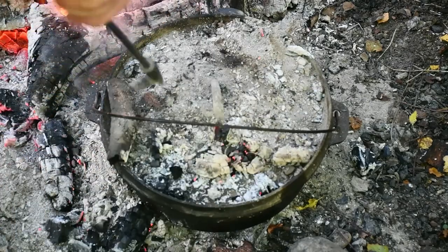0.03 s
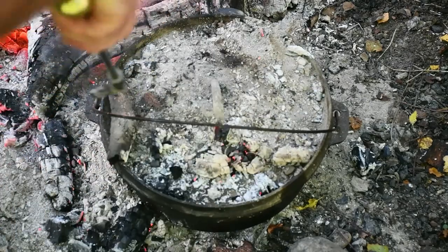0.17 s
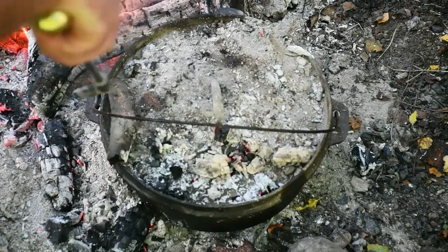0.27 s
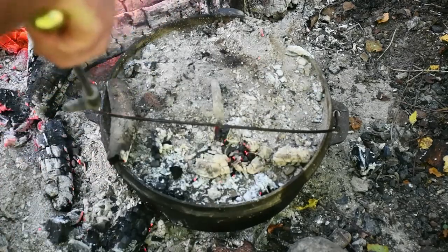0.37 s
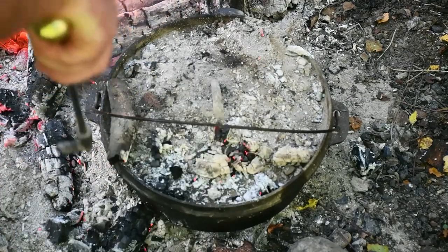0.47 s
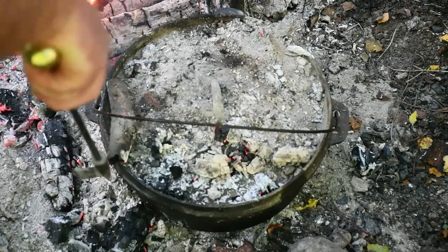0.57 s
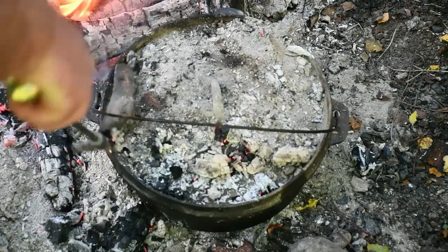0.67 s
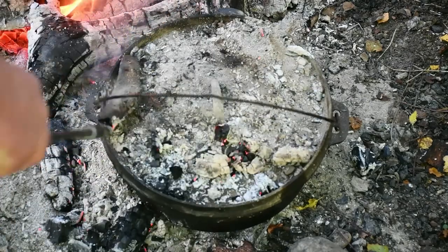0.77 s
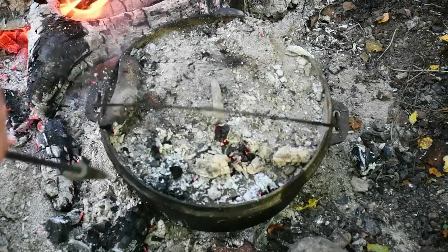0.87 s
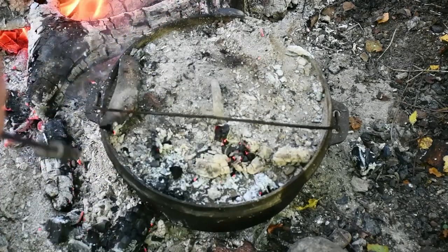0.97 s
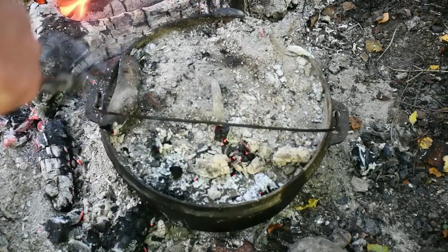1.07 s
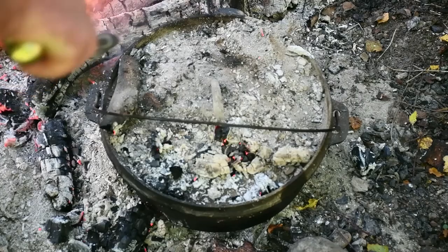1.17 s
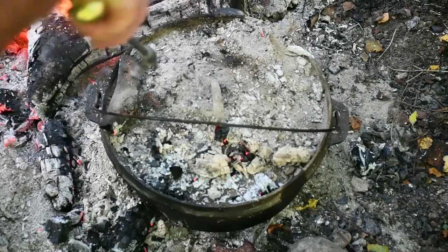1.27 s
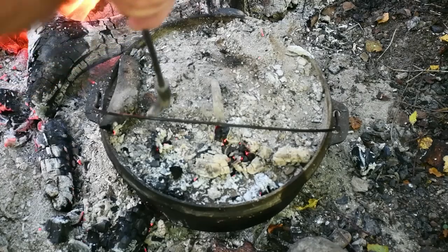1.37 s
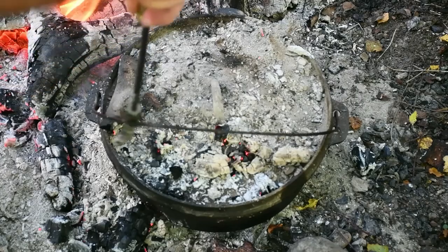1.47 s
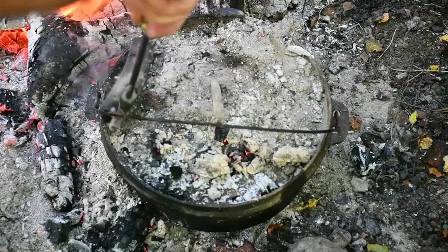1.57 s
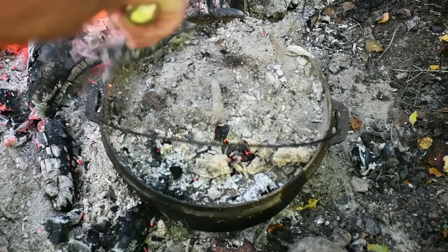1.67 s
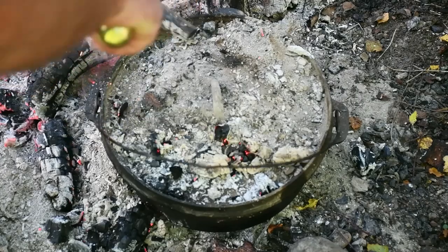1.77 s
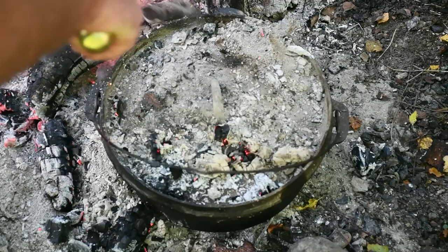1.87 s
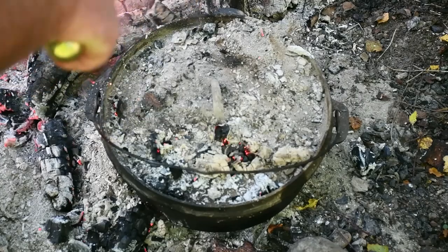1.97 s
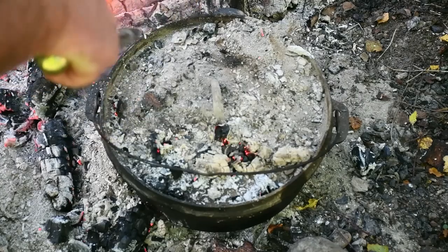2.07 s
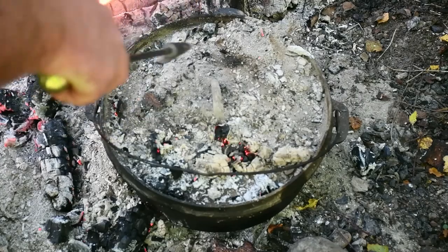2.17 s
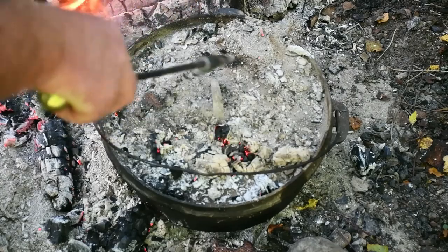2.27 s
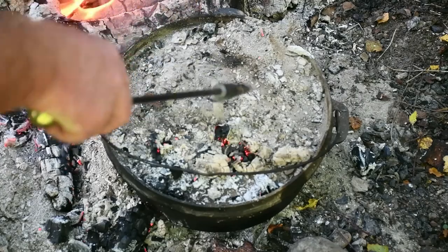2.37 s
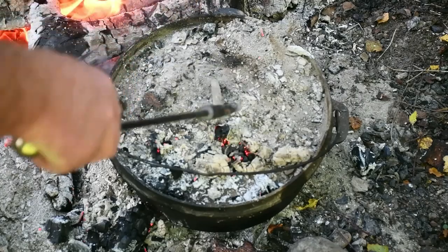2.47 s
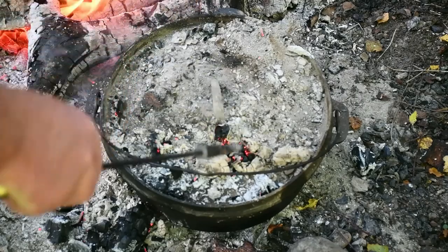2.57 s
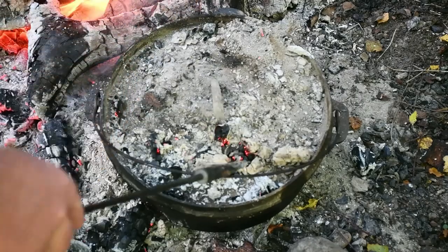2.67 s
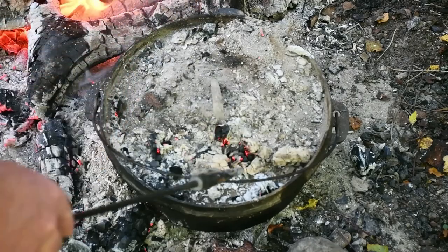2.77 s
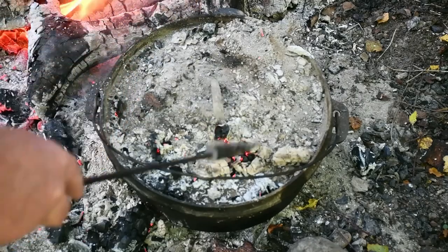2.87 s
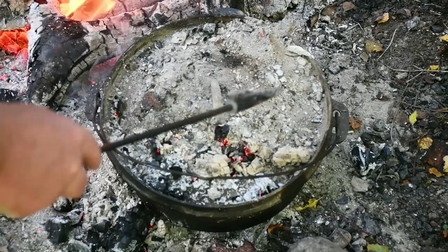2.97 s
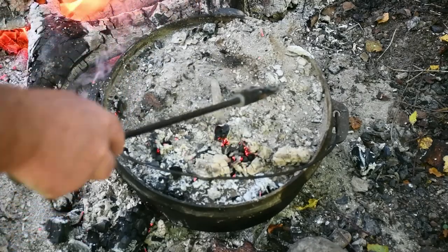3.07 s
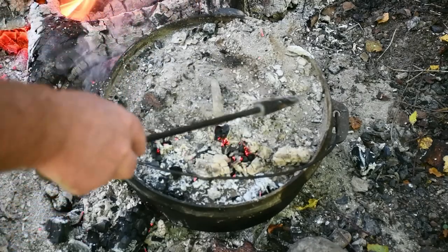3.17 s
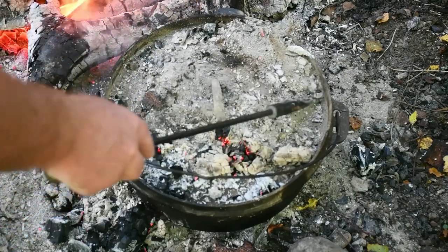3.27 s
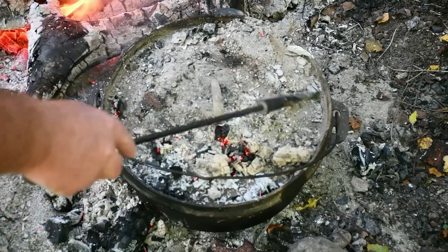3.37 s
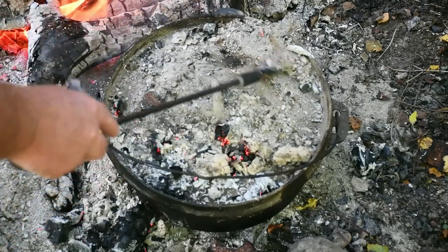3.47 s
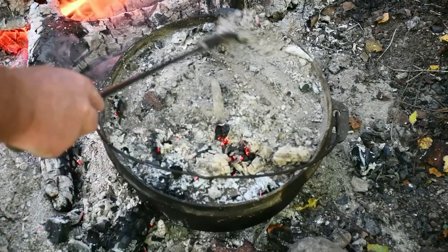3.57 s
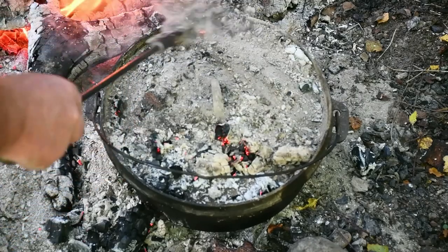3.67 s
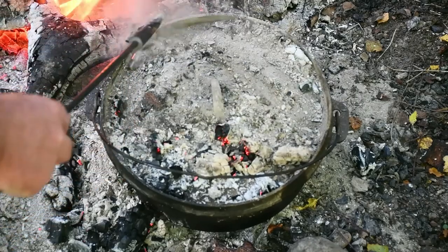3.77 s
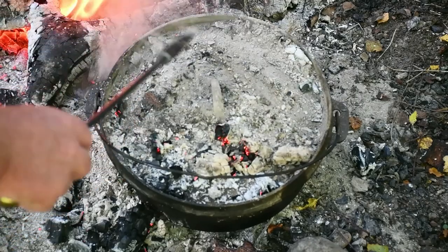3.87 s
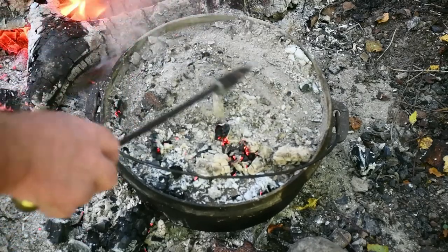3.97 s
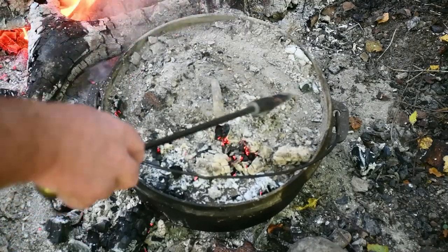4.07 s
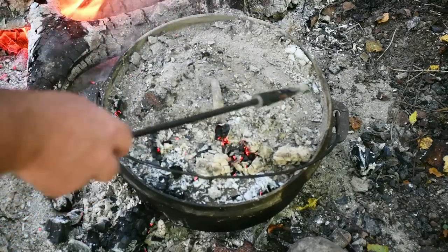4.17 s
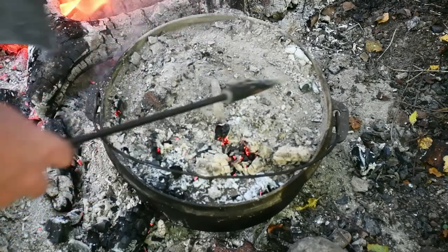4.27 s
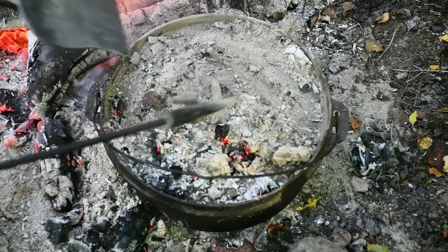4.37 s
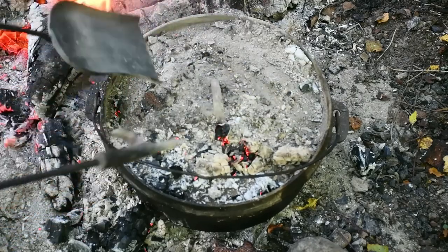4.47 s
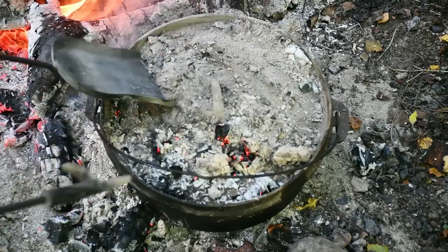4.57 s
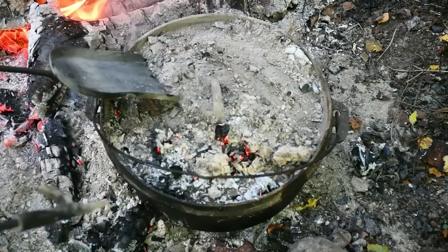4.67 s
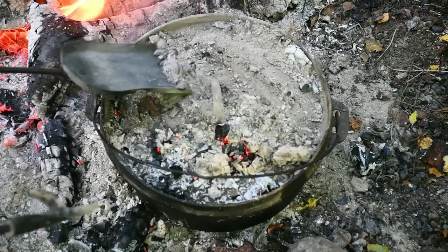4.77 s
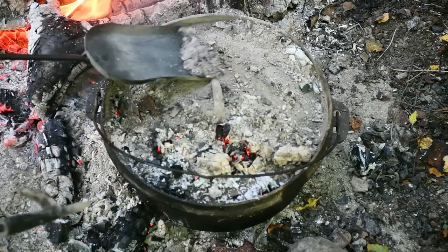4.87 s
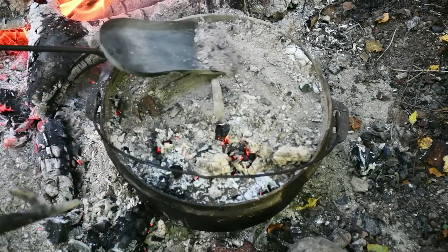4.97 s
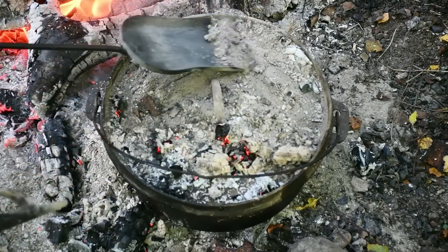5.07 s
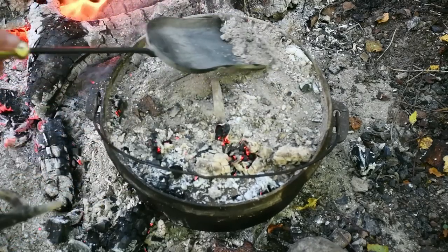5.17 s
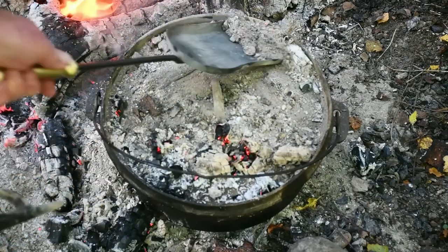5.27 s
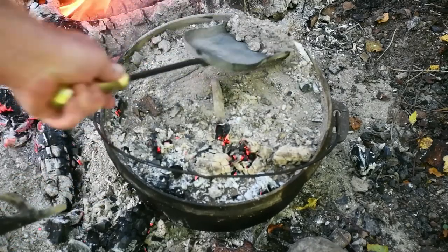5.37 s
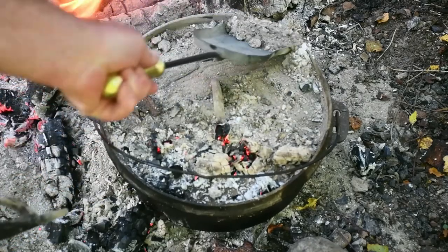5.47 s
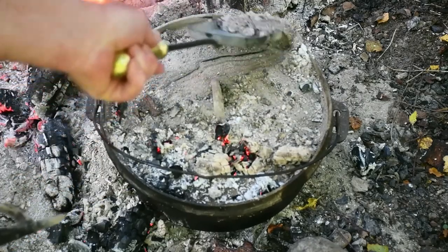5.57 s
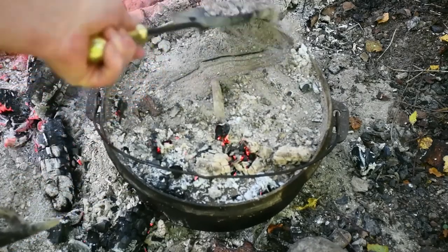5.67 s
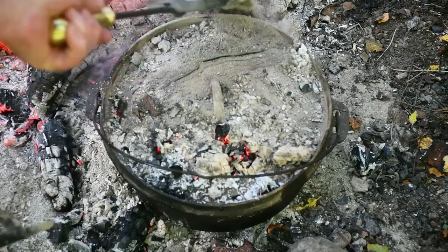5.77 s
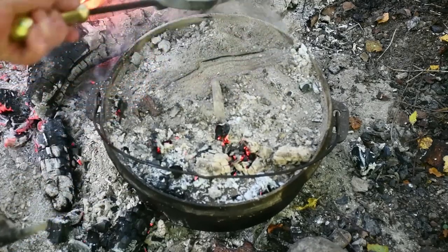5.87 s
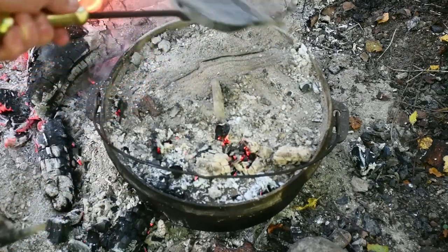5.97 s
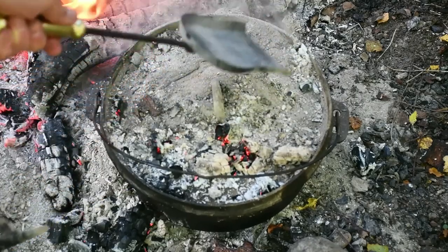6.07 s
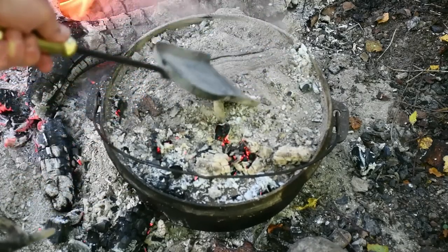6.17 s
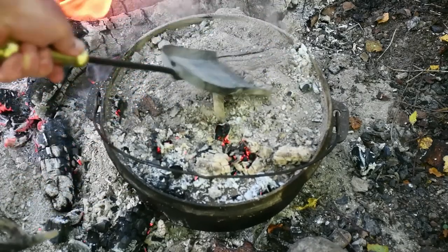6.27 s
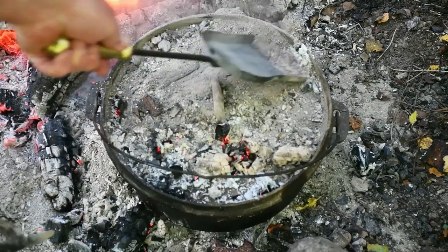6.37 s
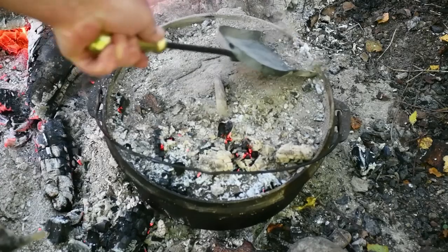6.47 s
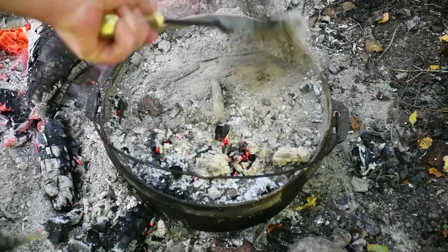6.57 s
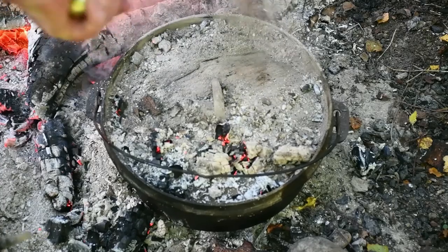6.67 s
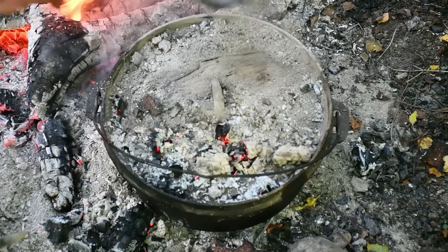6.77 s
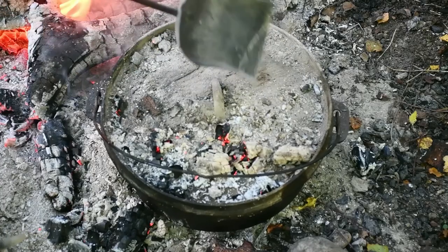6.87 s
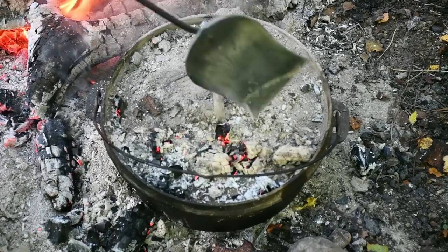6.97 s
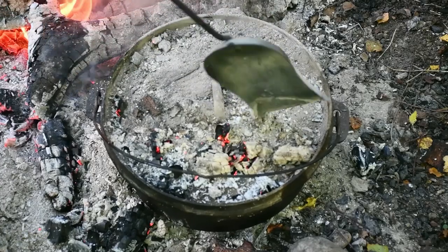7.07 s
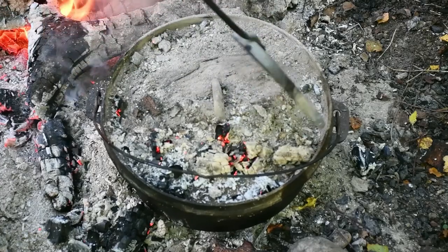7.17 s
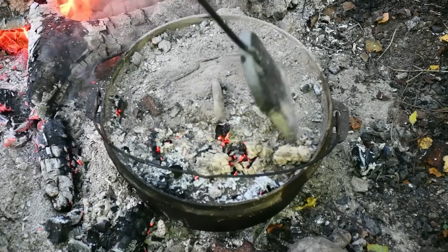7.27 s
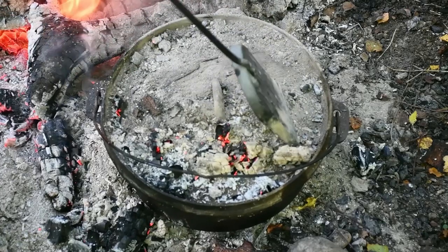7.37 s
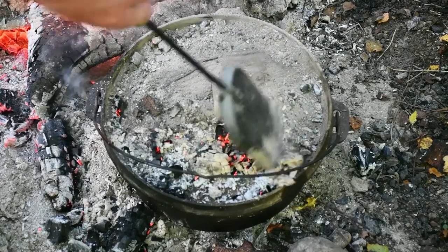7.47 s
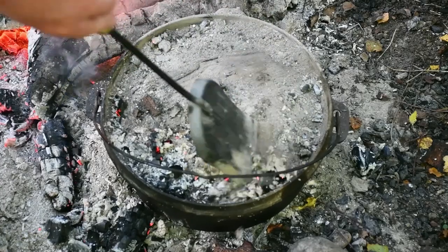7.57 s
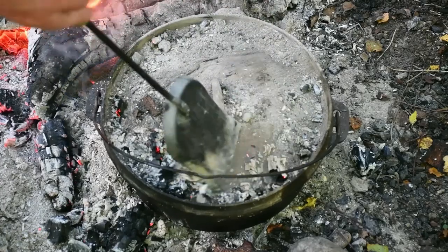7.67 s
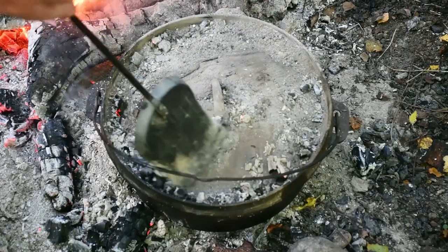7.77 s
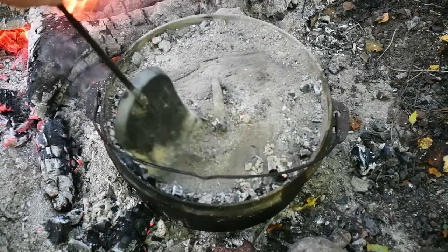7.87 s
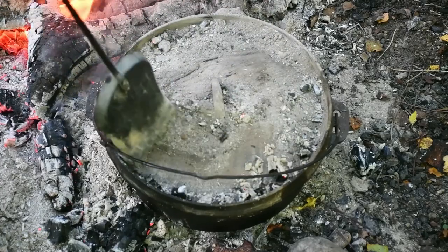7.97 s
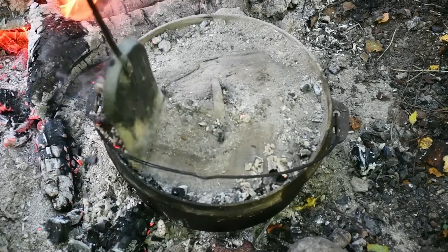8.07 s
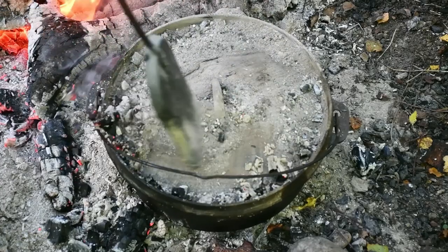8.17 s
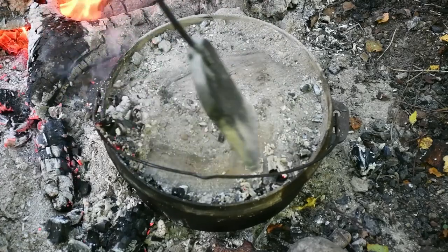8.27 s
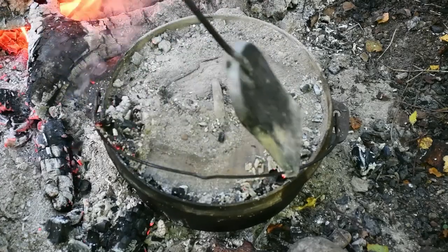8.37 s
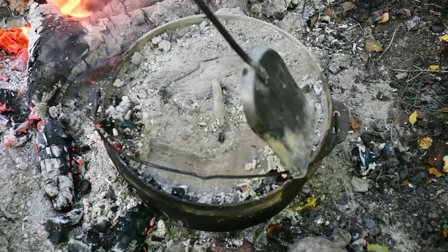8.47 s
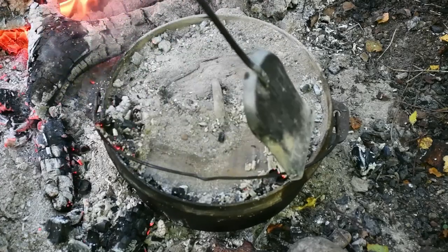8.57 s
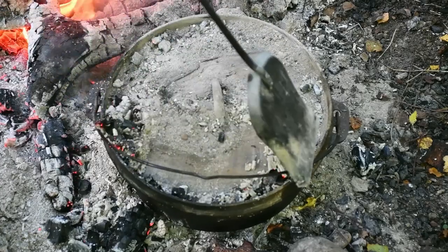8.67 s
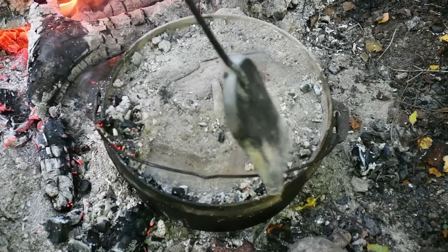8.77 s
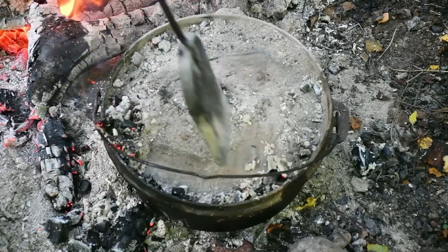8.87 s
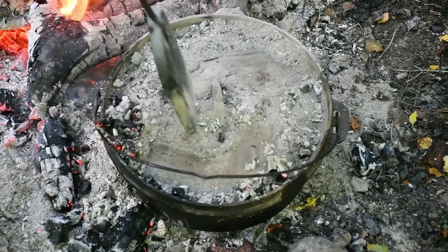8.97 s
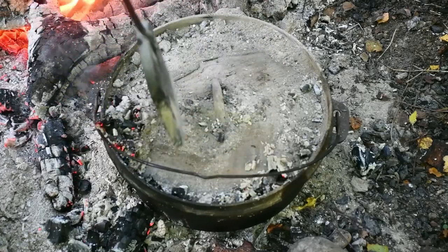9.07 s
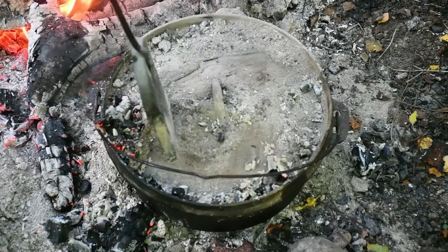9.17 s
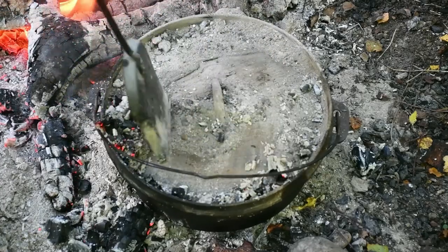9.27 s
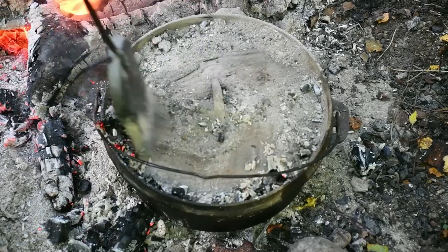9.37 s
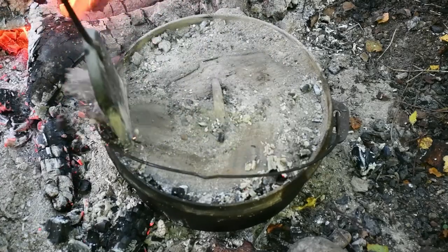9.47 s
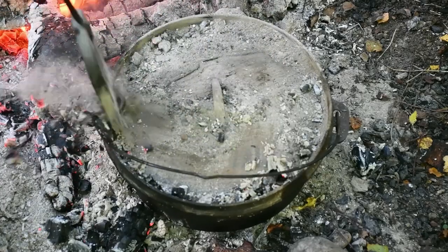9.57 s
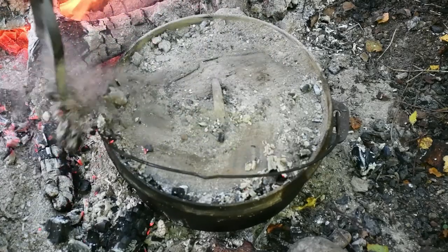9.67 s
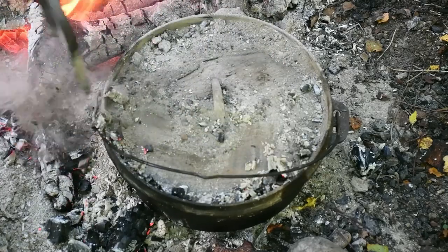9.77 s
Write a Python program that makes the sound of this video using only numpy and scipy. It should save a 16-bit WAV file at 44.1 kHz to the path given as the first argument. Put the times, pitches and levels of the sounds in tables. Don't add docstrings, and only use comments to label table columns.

```python
import sys
import numpy as np
from scipy import signal
from scipy.fft import rfft, irfft
from scipy.io import wavfile
from scipy.ndimage import uniform_filter1d

SR = 44100
rng = np.random.default_rng(int(sys.argv[2]) if len(sys.argv) > 2 else 0)


def digitize_waveform(pressure):
    field = np.atleast_2d(pressure).T
    bounded = np.clip(field, -1, 1)
    quanta = np.round(bounded * 32767).astype(np.int16)
    wavfile.write(sys.argv[1], SR, quanta)


def gain_from_decibels(decibels):
    exponent = np.asarray(decibels, float) / 20
    return 10 ** exponent


N = 433503

SIDES = np.array([[.5], [-.5]])


def evened(x):
    return x / np.sqrt(np.mean(abs(x) ** 2) + 1e-20)


def read(points, hz):
    f, value = np.transpose(points)
    return np.interp(np.log(hz + 1), np.log(f + 1), value)


def add(mix, s, sound):
    part = mix[:, round(s * SR):][:, :sound.shape[1]]
    part += sound[:, :part.shape[1]]


def pair(a, b, same):
    turn = np.arccos(np.clip(same, -1, 1)) / 2
    shared, apart = np.cos(turn) * a, np.sin(turn) * b
    return np.array([shared + apart, shared - apart])


def own_chance():
    return np.random.default_rng(rng.integers(2 ** 32))


# frequency in Hz, density in dB per Hz.
AIR_SPECTRUM = [(20, -46), (60, 3), (200, -12), (472, -8), (1120, -3), (2300, -11.5), (6180, -16.5),
                (8410, -11.5), (10800, -21.5), (16000, -21.5)]
# frequency in Hz, left-right likeness from -1 to 1.
AIR_LIKENESS = [(60, 0.99), (240, 0.56), (950, 0.078), (3770, -0.24), (15000, 0.25)]
# time in seconds, traffic level in dB, fire hiss level in dB.
AIR_LEVELS = [
    (0, -40.5, -47.5),
    (2, -45, -47.5),
    (6, -45.5, -45.5),
    (9.83, -43, -47.5),
]


def air():
    frames, hz = N // 256 + 5, np.fft.rfftfreq(1024, 1 / SR)
    a, b, c, d, patches = rng.standard_normal((frames, 513, 5)).T
    patches = evened(uniform_filter1d(uniform_filter1d(patches, 14, 0), 12, 1))
    patch_db = (1.4 + 0.83 * (hz < 180)[:, None]) * patches
    field = pair(a + 1j * b, c + 1j * d, read(AIR_LIKENESS, hz)[:, None])
    field = field * gain_from_decibels(read(AIR_SPECTRUM, hz)[:, None] + patch_db)
    s, *levels_db = np.transpose(AIR_LEVELS)
    traffic = (hz < 2200)[:, None]
    out = 0
    for band, level_db in zip((traffic, ~traffic), levels_db):
        part = evened(signal.istft(field * band, nperseg=1024, noverlap=768)[1][:, :N])
        out = out + part * gain_from_decibels(np.interp(np.arange(N) / SR, s, level_db))
    return out


# order, full from in seconds, full until in seconds, level in dB.
MOTOR_ORDERS = [
    (2, 2, 5.64, -56),
    (3, 4.05, 4.75, -57.5),
]
MOTOR_FADES = np.array([25, 60])


def hum():
    motor_hz, wander = 114.4, 0.0033
    t = np.arange(N) / SR
    order, start, end, db = np.transpose(MOTOR_ORDERS)[..., None]
    drift = evened(uniform_filter1d(rng.standard_normal(N), 9000))
    phase = 2 * np.pi * np.cumsum(motor_hz * (1 + wander * drift)) / SR
    away = np.maximum(np.maximum(start - t, t - end), 0)
    level = gain_from_decibels(db - MOTOR_FADES[:, None] * away)
    return (level * np.sin(np.round(order) * phase)).sum(0)


def strokes(touches, attack_s, release_s, gain, clang_db, follow, knock_db):
    lift_db, join_s, step_s = 25, .06, .001
    knock_db_per_s, knock_quicker = 303, 2.6
    judder_per_db, judder_steps = .065, 12
    rows = np.array(touches)
    gaps_s = rows[1:, 0] - rows[:-1, :2].sum(1)
    for part in np.split(rows, 1 + np.flatnonzero(gaps_s > join_s)):
        start, length, db, change_db, thump_db = part.T[..., None]
        hard = np.clip(-change_db / length / knock_db_per_s, 0, 1)
        t = np.arange(start.min() - attack_s, (start + length).max() + release_s, step_s)
        landing = (start - t) / attack_s * (1 + knock_quicker * hard)
        lifting = (t - start - length) / release_s
        shape_db = change_db * np.clip((t - start) / length, 0, 1)
        shape_db = shape_db - lift_db * np.maximum(np.maximum(landing, lifting), 0)
        lead = (db + shape_db).argmax(0), np.arange(len(t))
        grit = (db + shape_db)[lead]
        thump = np.minimum(thump_db - gain * shape_db, 6)
        clang = clang_db + follow * thump + knock_db * hard * gain_from_decibels(shape_db / 2)
        judder = evened(uniform_filter1d(own_chance().standard_normal(len(t)), judder_steps))
        grit = grit + judder_per_db * grit * judder
        yield np.transpose([t, grit, thump[lead], clang[lead]])


def crossover(hz):
    low_hz, high_hz = 450, 1700
    pot = (1j * hz / (150 + 1j * hz)) ** 4 / (1 + 1j * hz / low_hz) ** 2
    pot = pot * (.2 + 1 / (1 + 1j * (hz - 205) / 60))
    grit = (1j * hz / high_hz / (1 + 1j * hz / high_hz)) ** 3
    lid = (1j * hz / low_hz / (1 + 1j * hz / low_hz) / (1 + 1j * hz / high_hz)) ** 3
    return grit, pot, lid


LID_MODES = [820, 1190, 1530, 1790, 2020, 2320, 2640, 3280, 3550, 3690, 4180, 4440, 4720, 5060, 5270, 5440,
             5790, 5980]
# frequency in Hz, left-right likeness from -1 to 1.
TOUCH_LIKENESS = [(950, 1), (3770, 0.58), (15000, 0.23)]
# frequency in Hz, left-right difference in dB.
TOUCH_LEAN = [(60, 4), (380, -1), (2380, 0), (15000, -3)]


def touch(stroke, modes, colour, grit):
    hop, size, roam_db = 2200, 2 ** 13, 14
    s, level_db, thump_db, clang_db = np.transpose(stroke)
    grit_db, per_s, spread_db, crowd_db = grit
    t = np.arange(s[0], s[-1], 1 / SR)
    hz = np.fft.rfftfreq(size, 1 / SR)
    roam, draw = own_chance(), own_chance().random((len(t), 4)).T

    grains = gain_from_decibels(-spread_db * np.log(draw[0] + 0.011)) * (draw[1] < per_s / SR)
    grains = evened(grains * np.sign(draw[2:] - .5)) * signal.windows.tukey(len(t), 200 / len(t))
    drives = []
    for relative_db in (0, thump_db, clang_db):
        drive = grains * gain_from_decibels(np.interp(t, s, level_db + relative_db))
        drives.append(np.pad(drive, ((0, 0), (hop, 2 * hop))))

    plain = gain_from_decibels(grit_db + read(colour, hz))
    shapes = [gain_from_decibels(db) / (1 + 2j * (hz - f) / max(w, 18)) for f, w, db in modes]
    crowd_hz = np.append(LID_MODES, 6100 + 170 * (np.arange(57) + rng.random(57)))
    shapes += [gain_from_decibels(crowd_db) * plain / (1 + 2j * (hz - f) / 26) for f in crowd_hz]
    shapes = np.array(shapes)
    swing = np.where(np.arange(len(shapes)) < len(modes), .3, 1)

    bands = crossover(hz)
    window = signal.windows.hann(2 * hop, False) ** .5
    balance = gain_from_decibels(SIDES * read(TOUCH_LEAN, hz))
    out = np.zeros((2, len(t) + hop + size))
    for at in range(0, len(t) + hop, hop):
        weight = roam.uniform(-1, 1, len(shapes))
        body = plain + (np.sign(weight) * gain_from_decibels(-roam_db * swing * abs(weight))) @ shapes
        answers = (body, 1, body)
        total = 0
        for drive, band, answer in zip(drives, bands, answers):
            total = total + rfft(drive[:, at:at + 2 * hop] * window, size) * evened(answer * band)
        a, b = total
        out[:, at:at + size] += irfft(pair(a, b, read(TOUCH_LIKENESS, hz)) * balance, size)
    return s[0], out[:, hop:]


def contact(mix, touches, hand, body):
    for stroke in strokes(touches, *hand):
        add(mix, *touch(stroke, *body))


# start in #
# seconds, length in seconds, grit level in dB, change over the length in dB, pot thump in dB relative to the
EDGE_TOUCHES = [
    (0.108, 0.098, -47.5, -17, -28),
    (3.038, .11, -42, -12, -22),
    (8.725, 0.095, -22, -2, -37),
    (8.815, .16, -26, -21, -32.5),
]
# attack in seconds, release in seconds, thump gained per dB of grit
# lost, lid clang in dB, clang in dB per dB of thump, extra clang of a hard knock in dB.
EDGE_HAND = ((.028, .03, .4, -.1, .99, .1))
# frequency in Hz, level in dB. Last, grit under the modes in dB, grains per second, size spread
# in dB, lesser modes over the grit in dB.
EDGE_BODY = ([(6890, 27, -10), (7500, 50, -2), (8240, 33, -12), (9100, 78, 2)], [(2940, -53), (5900, -34),
              (7140, -7.5), (7600, -10), (7750, -22), (8450, -6.5), (9020, -11), (9510, -40), (11000, -39),
              (16000, -58)], (3.5, 9006, 3, 19))


def edge(mix):
    contact(mix, EDGE_TOUCHES, EDGE_HAND, EDGE_BODY)


def ring(s, hz, db, t60):
    rattle, rattle_s, swell_s = .25, .006, 0.0042
    t = np.arange(int(t60 * SR)) / SR
    smooth = int(rattle_s * SR)
    unrest = uniform_filter1d(own_chance().standard_normal(len(t)), smooth)
    flutter = 1 + rattle * evened(uniform_filter1d(unrest, smooth))
    envelope = gain_from_decibels(db - 60 * t / t60) * (1 - np.exp(-t / swell_s))
    return s, flutter * envelope * np.sin(2 * np.pi * hz * t + SIDES * 0.63)


# frequency in Hz, level in dB, t60 in seconds.
CLANK_MODES = [(1190, -9, 0.13), (1535, -10, 0.1), (2022, -1, 0.11), (2630, -11, 0.13), (3500, -11, 0.14),
               (4180, -12, 0.14), (5163, -11, 0.17), (5330, -9, .1), (5960, -12, 0.14), (4620, -12, .08),
               (6900, -12, .1), (7340, -9, 0.15), (8600, 0, 0.097)]


def clank(mix):
    start_s, level_db, longest_s = .629, -5.5, .22
    for hz, db, t60 in CLANK_MODES:
        add(mix, *ring(start_s, hz, level_db + db, min(t60, longest_s)))


# start in seconds, length in seconds, grit level in dB, # change over
# the length in dB, pot thump in relative dB.
HANDLE_TOUCHES = [
    (0.63, .08, -15.5, -17, -23.5),
    (.713, .1, -32, -12, -20),
]
HANDLE_HAND = ((.016, .02, .1, 8.1, 0.86, .1))
HANDLE_BODY = ([(5930, 60, -9)], [(240, -34), (400, 2), (1870, 0), (8240, -3), (12500, -14.5),
                (16000, -37)], (-4, 7000, 2, 10.5))


def handle(mix):
    contact(mix, HANDLE_TOUCHES, HANDLE_HAND, HANDLE_BODY)


# start in seconds, frequency in Hz, level in dB, t60 in seconds.
LONE_RINGS = [(3.238, 205, -17, 0.13), (3.45, 2020, -26, 0.2), (3.5, 2650, -28, .15),
              (3.6, 2310, -23, 0.33), (3.6, 2480, -23, 0.24), (3.586, 1520, -16, .1),
              (5.097, 2050, -15, .14), (5.097, 1165, -22, .2), (6.535, 2020, -16, .08),
              (4.86, 520, -20, .08), (3.62, 7250, -22, 0.3), (3.635, 2020, -21, .2), (4.57, 3280, -30, .2),
              (4.997, 4400, -20, .1), (5.01, 2060, -22, .1), (5.6, 2100, -13, 0.074),
              (7.31, 2638, -8.5, 0.1), (7.35, 2015, -22.5, 0.64), (7.34, 205, -12.5, 0.13),
              (9.137, 330, -9, 0.035), (6.426, 280, -13, 0.04), (6.426, 950, -10, .03),
              (6.284, 1290, -14, .25), (6.33, 1190, -15, .3), (8.55, 430, -33, .12), (7.432, 185, -15, .07),
              (9.4, 520, -24, .1), (9.138, 1600, -13, .025), (3.586, 1780, -14, .07),
              (9.426, 300, -10, .06), (9.232, 260, -22, .06), (9.14, 2650, -25, .12),
              (9.395, 2650, -20, .15), (9.58, 5060, -34, .3), (.662, 1190, -22, .08),
              (.665, 2022, -21, .08), (.64, 2022, -7, .06), (6.55, 1570, -26, .19)]


def lone_rings(mix):
    for row in LONE_RINGS:
        add(mix, *ring(*row))


def pop(s, peak_db, hz, octaves, crack_s=0.0037):
    t = np.arange(2000) / SR
    noise = rng.standard_normal((2000, 3)).T
    noise[0, 0] = 5
    decay = gain_from_decibels(-60 * t / crack_s) + gain_from_decibels(-23 - 60 * t / .08)
    burst = (noise[0] + .5 * noise[1:]) * decay
    edges_hz = np.clip(hz * 2. ** (SIDES[::-1, 0] * max(octaves, .3)), 150, 19000)
    thud = signal.lfilter(*signal.butter(1, [600, 2500], "bandpass", fs=SR), burst)
    burst = signal.lfilter(*signal.butter(2, edges_hz, "bandpass", fs=SR), burst)
    burst = burst + gain_from_decibels(-24 + 6 * octaves) * thud
    burst = signal.lfilter(*signal.butter(2, 11500, fs=SR), burst)
    return s, gain_from_decibels(peak_db) * burst / abs(burst.mean(0)).max()


# time in seconds, peak in dB, centre in Hz, width in octaves,
# and for some cracks their own decay in seconds.
CRACKS = [(0.7145, -13, 6500, 1.2, .015), (1.939, -6, 4500, 3.43), (2.385, -25, 6750, 1.6),
          (2.4414, -11, 6500, .8), (2.7706, -5, 4970, 2.2), (2.7958, -14, 5400, 2.1), (3.237, -15, 2500, 3),
          (3.5327, 1.5, 8200, 0.56), (4.3218, 5, 4800, 2.6), (5.3747, -12.5, 4500, 2.5),
          (5.9623, -15.5, 4670, 2.5), (6.1998, -6, 5000, 3), (6.7277, -18, 4530, 1.9),
          (6.7495, -18.5, 2140, 1.4), (6.9516, -24, 5580, 1.4), (7.8466, 2, 7000, 1, .002),
          (9.6879, 3, 8500, 0.6, .008), (7.3045, -4, 5000, 2.5), (7.538, -4, 6000, 2),
          (6.516, -5, 3000, 2.5), (8.529, -8, 6000, 2), (9.1395, -6, 1200, 2.6), (9.729, -16, 5000, 1),
          (9.58, -24, 4500, 1.2)]


def cracks(mix):
    for row in CRACKS:
        add(mix, *pop(*row))


# time in seconds, peak in dB.
EMBER_TICKS = [(0.7225, -19), (0.8066, -24), (1.445, -26), (1.5024, -11), (1.5474, -18), (1.7204, -21.5),
               (1.919, -23), (2.003, -19), (2.5112, -22.5), (2.949, -30.5), (3.902, -28), (4.6566, -20),
               (5.265, -19), (5.48, -22), (6.107, -26.5), (6.1413, -24), (6.8124, -21.5), (7.0408, -23),
               (7.0745, -21.5), (7.115, -22.5), (7.163, -30), (7.2553, -20.5), (8.154, -29), (8.283, -29),
               (8.3409, -23), (8.549, -7), (8.9672, -21), (9.1885, -22), (9.2613, -21), (9.2986, -23),
               (9.7382, -12.5), (1.591, -20), (1.62, -22), (1.73, -21), (1.757, -25), (1.95, -21),
               (3.918, -30), (3.972, -29), (3.81, -32), (6.465, -24), (9.567, -24), (5.32, -24)]


def ticks(mix):
    centre_hz, octaves, crack_s = 8300, 1.4, 0.013
    for s, peak_db in EMBER_TICKS:
        add(mix, *pop(s, peak_db, centre_hz, octaves, crack_s))


# start in seconds, length in seconds, grit level in dB,
# change over the length in dB, pot thump in relative dB.
COALS_TOUCHES = [(1.456, .044, -24, -7, -15), (1.5, .09, -28, -11, -16), (1.618, .09, -38, -8, -14),
                 (1.72, .1, -40, -4, -14), (1.85, .05, -43, -4, -12), (1.942, .07, -39, -8, -2),
                 (2.618, .05, -17.5, -30, -17), (2.68, .04, -31, -11, -16), (2.725, .035, -29.5, -12, -7.5),
                 (2.84, .06, -31.5, -23, -22), (6.722, .55, -45, -6, -19), (8.529, .02, -19, -8, -24),
                 (8.549, .09, -21, -30, -27), (9.21, .065, -47, 8, 2), (9.49, 0.17, -31.5, -12, -28),
                 (9.694, .125, -21, -28.5, -38)]
COALS_HAND = ((.006, .03, 0.49, 0.016, 0.94, .1))
COALS_BODY = ([(3800, 27, 0), (9850, 120, 1)], [(59, -48), (100, -13), (224, 5.5), (1480, -6), (9020, -5),
               (14400, -23), (16000, -36)], (1.3, 9000, 2.5, 5))


def coals(mix):
    contact(mix, COALS_TOUCHES, COALS_HAND, COALS_BODY)


# centre in seconds, width in seconds, level in dB.
WIND_GUSTS = [
    (3.5, .3, -61),
    (6.36, .12, -48),
    (6.55, .15, -56),
    (7.05, .3, -53),
]


def wind():
    t = np.arange(N) / SR
    band = signal.butter(2, [25, 90], "bandpass", fs=SR, output="sos")
    noise = evened(signal.sosfilt(band, rng.standard_normal((N, 2)).T))
    gusts = sum(gain_from_decibels(db) * np.exp(-((t - s) / width) ** 2) for s, width, db in WIND_GUSTS)
    return noise * gain_from_decibels(SIDES * 5) * gusts


# start in seconds, length in seconds, grit level in dB,
# change over the length in dB, pot thump in relative dB.
POKER_TOUCHES = [
    (3.236, 0.09, -29, -16, -8),
    (3.362, .018, -32.5, -7.5, -2.5),
    (3.395, 0.155, -26, -0.5, -15.5),
    (3.576, .012, -34, 12, -20),
    (3.588, .03, -13, -7, -22),
    (3.62, 0.077, -20, -8.5, -24),
    (3.7, 0.13, -36, -12, -26),
]
POKER_HAND = ((0.015, 0.01, .15, -2, 0.33, 9))
POKER_BODY = ([(4670, 120, 6), (2620, 27, -3), (6160, 69, 7), (7280, 110, 12), (8590, 140, 5),
               (9850, 120, -2)], [(240, -49), (600, -9), (1990, -7.5), (2930, 2.5), (6540, 4), (7280, -3),
               (10000, -3), (12500, -13), (16000, -30)], (-13.5, 7990, 4, 14))


def poker(mix):
    contact(mix, POKER_TOUCHES, POKER_HAND, POKER_BODY)


# frequency in Hz, level in dB, t60 in seconds.
BLOW_MODES = [
    ((3.584, -12, .2), [(900, -3, 0.088), (2013, -1, 0.11), (2638, -3, 0.12), (3305, -7, 0.12), (3548, -18, 0.31), (4032, -13, 0.074), (4657, -7, 0.086), (5313, 0, 0.059), (5900, -7, 0.097), (6605, -21, 0.38), (7111, -22, 5.0), (7375, -7, 0.43)]),
    ((4.859, -6, .17), [(807, -16, 0.19), (1195, 0, 0.17), (1523, -19, 0.46), (2013, -13, 0.12), (4183, -5, 0.14), (4371, -5, 0.12), (5437, -20, 0.44), (5782, -13, 0.14), (5981, -14, 0.3), (7337, -19, 0.14), (7628, -15, 0.092), (7919, -20, 0.35)]),
    ((5.104, -15, .15), [(1459, -8, 0.42), (3252, -11, 0.095), (3677, -13, 0.46), (4177, -5, 0.21), (4377, -5, 0.22), (5050, -2, 0.27), (5276, -12, 0.32), (5792, -16, 0.51), (6514, -10, 0.12), (6901, -10, 0.18), (7612, -5, 0.11), (7924, 0, 0.14)]),
    ((8.549, -22, .09), [(4124, -20, 0.39), (4355, 0, 0.07), (5286, -9, 0.11), (5970, 0, 0.06), (7887, -19, 0.15), (8737, -6, 0.09), (9259, -5, 0.082), (9593, -2, 0.042)]),
    ((6.516, -14, .15), [(1190, -12, 5.0), (2019, -35, 5.0), (3090, -15, 0.48), (3709, -9, 0.25), (4290, -2, 0.19), (5093, -11, 0.28), (5276, -11, 0.25), (6078, 0, 0.12), (7101, -16, 0.092), (7607, -11, 0.27)]),
    ((8.043, -34, .2), [(5060, -1, 0.14), (5265, -8, 0.39), (5787, -9, 0.31), (6686, -5, 0.22), (8985, -9, 1.3), (9292, 0, 0.12)]),
]


def blows(mix):
    for (s, blow_db, longest_s), modes in BLOW_MODES:
        for hz, db, t60 in modes:
            add(mix, *ring(s, hz, blow_db + db, min(t60, longest_s)))


# start in seconds, length in seconds, grit level in dB,
# change over the length in dB, pot thump in relative dB.
SCOOP_TOUCHES = [(4.57, 0.055, -30, -9, -30), (4.62, 0.24, -36, 15, -18), (4.859, .03, -9, -7, -18),
                 (4.9, .09, -25, -4, -26), (4.997, 0.03, -21, -5, -25), (5.066, .03, -27, 2, -23),
                 (5.097, .03, -12.5, -2, -24), (5.127, .03, -18, -8, -24), (5.16, 0.188, -26.5, -10.5, -20),
                 (5.42, .09, -33, -9.5, -6), (5.52, 0.034, -37.5, 11.5, -11), (5.602, 0.084, -19, -27, -18)]
SCOOP_HAND = ((0.036, 0.07, 0.34, -2, 0.31, 10.5))
SCOOP_BODY = ([(1193, 30, -0.5), (3680, 45, 1), (4190, 42, 1), (4447, 26, 5), (5060, 34, 6), (5790, 40, 2),
               (5980, 37, 4.5), (7900, 110, 0), (8820, 57, 4.5), (10070, 200, -6)], [(240, -52), (480, -21),
               (1400, -6), (3020, -6), (4310, -6.5), (8900, -11.5), (16000, -29.5)], (-9, 8000, 3, 15.5))


def scoop(mix):
    contact(mix, SCOOP_TOUCHES, SCOOP_HAND, SCOOP_BODY)


# start in seconds, length in seconds, grit level in dB,
# change over the length in dB, pot thump in relative dB.
SHOVE_TOUCHES = [
    (6.19, 0.055, -35, -3, -9),
    (6.259, .026, -20, -3, -21),
    (6.287, .125, -12.5, 0.5, -22),
    (6.428, .02, -19, -14, -6),
    (6.47, .035, -40, 10, -30),
    (6.516, .035, -11, -2.5, -30),
    (6.59, 0.075, -37.5, -14, -23),
]
SHOVE_HAND = ((.022, .04, .3, 3.35, .4, 4))
SHOVE_BODY = ([(825, 45, 2), (1185, 46, 2.5), (1340, 70, -1), (4390, 63, 2), (4720, 69, 0), (5280, 57, 0),
               (6210, 38, 1), (6770, 59, -1), (7840, 40, 1), (8950, 98, 5.5), (10160, 34, 1)], [(59, -62),
               (100, -75), (189, -27.5), (705, -7), (1170, 2.5), (2000, 14), (4000, 11.5), (9020, 9),
               (16000, -7.5)], (-20, 8008, 4, 14.5))


def shove(mix):
    contact(mix, SHOVE_TOUCHES, SHOVE_HAND, SHOVE_BODY)


# start in seconds, length in seconds, grit level in dB,
# change over the length in dB, pot thump in relative dB.
SWEEP_TOUCHES = [
    (7.305, .03, -10.5, -8.5, -19.5),
    (7.335, .075, -19, -22.5, -11.5),
    (7.436, 0.062, -13, 2.5, -19),
    (7.5, 0.051, -10.5, -5.5, -28.5),
    (7.57, .03, -13, -6.5, -26),
    (7.618, 0.12, -12, -13.5, -30),
    (7.75, 0.074, -18, -4, -17),
    (7.83, 0.073, -26, 14, -11),
    (7.9, 0.044, -12, -7.5, -22),
    (7.98, .16, -33, -13, -22),
]
SWEEP_HAND = ((.018, .045, .45, 0.099, 0.39, .1))
SWEEP_BODY = ([(204, 46, -3), (2010, 47, 2), (2640, 40, 10.5), (3550, 40, 4.5), (4130, 30, 9),
               (4455, 26, 12), (8730, 34, 8), (8980, 30, -2), ], [(240, -42), (450, -3), (850, -8),
               (2880, 2.5), (4310, 3.5), (7280, -1), (8900, 4.5), (16000, -11)], (-10.5, 8998, 2.5, 14.5))


def sweep(mix):
    contact(mix, SWEEP_TOUCHES, SWEEP_HAND, SWEEP_BODY)


# start in seconds, length in seconds, grit level in dB,
# change over the length in dB, pot thump in relative dB.
FLICK_TOUCHES = [
    (9.132, .03, -23, -16, -16),
    (9.15, .04, -32, -20, -4),
    (9.336, 0.018, -22, 11, -22),
    (9.354, .056, -10, -1.4, -25),
    (9.41, .035, -23, -8, -9),
]
FLICK_HAND = ((.015, .03, .3, 0, .4, 4))
FLICK_BODY = ([(1220, 60, -9), (2650, 40, -10), (4180, 120, -5), (5260, 60, -5), (6730, 110, -8),
               (7060, 31, -6), (7840, 60, 5), (8700, 150, 1), (9530, 40, -5), (10200, 45, 1),
               (11500, 44, -5)], [(190, -20), (500, -8), (1170, -9), (2470, 1), (5000, 9), (9020, 10),
               (16000, -8)], (-22, 8000, 4, 13))


def flick(mix):
    contact(mix, FLICK_TOUCHES, FLICK_HAND, FLICK_BODY)


# start in seconds, length in seconds, grit level in dB,
# change over the length in dB, pot thump in relative dB.
RIM_TOUCHES = [
    (9.522, .14, -22, -12, -36),
    (9.692, .06, -22, -16, -36),
]
RIM_BODY = ([(5040, 110, -10), (7850, 160, -2), (8710, 180, 0), (9310, 60, -8)], [(2900, -36), (7000, -26),
             (8300, -14), (9600, -22), (16000, -45)], (0, 9000, 3, 10))


def rim(mix):
    contact(mix, RIM_TOUCHES, EDGE_HAND, RIM_BODY)


def scene():
    mix = air() + hum()
    for source in (edge, clank, handle, lone_rings, cracks, ticks, coals, poker, blows,
                   scoop, shove, sweep, flick, rim):
        source(mix)
    return mix + wind()


def low_pass(x):
    return signal.sosfilt(signal.butter(12, 15750, fs=SR, output="sos"), x)


def record(dry):
    mix = np.clip(dry, -.9, .9)
    return low_pass(mix)


dry = scene()
out = record(dry)
digitize_waveform(out)
```